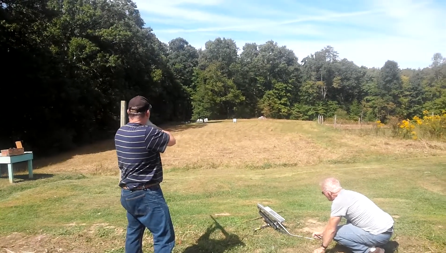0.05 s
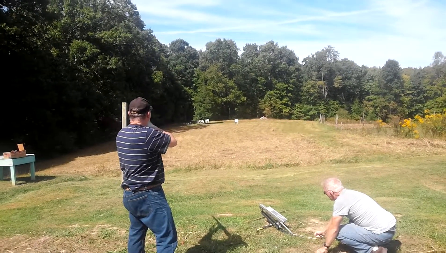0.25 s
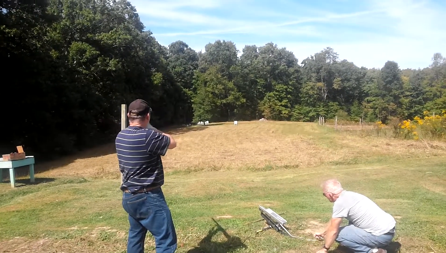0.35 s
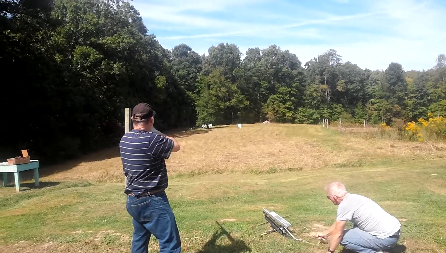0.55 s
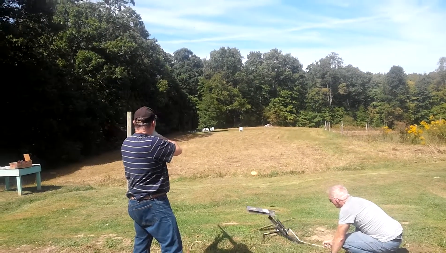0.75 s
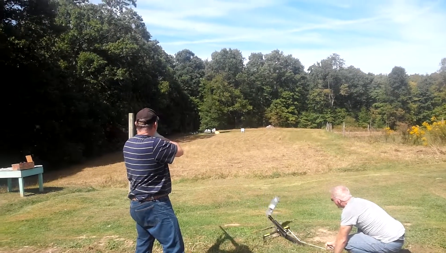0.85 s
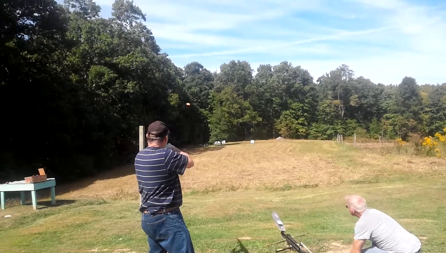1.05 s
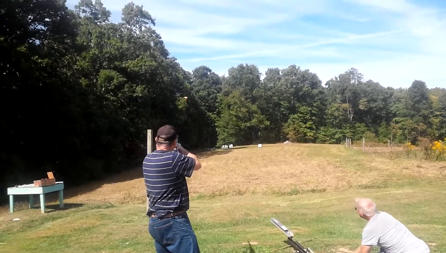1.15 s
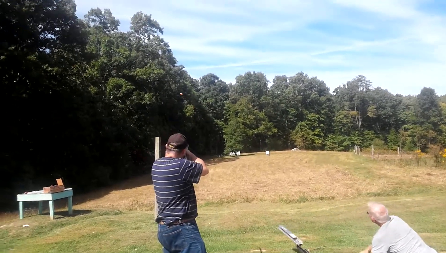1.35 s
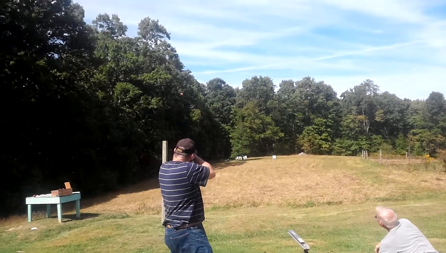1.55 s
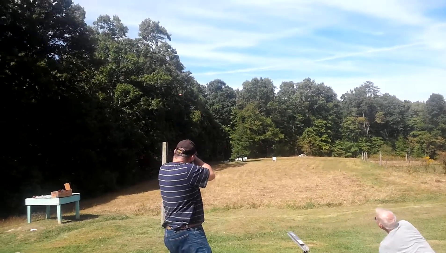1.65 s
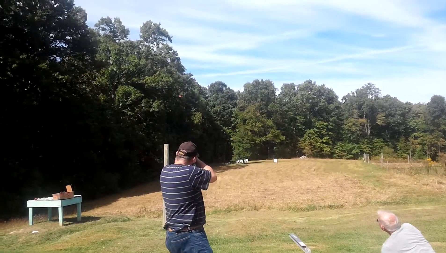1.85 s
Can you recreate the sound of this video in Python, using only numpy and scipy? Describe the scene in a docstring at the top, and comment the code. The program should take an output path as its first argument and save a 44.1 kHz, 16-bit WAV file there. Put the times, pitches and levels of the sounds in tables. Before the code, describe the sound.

A spring-loaded clay target thrower fires once, its steel arm slamming and rebounding with a ringing rattle. Wind rumbles on the microphone before and after, while grass hisses and insects chirp faintly in the open field.

```python
"""Gusts buffet the two microphone ports in an open field and hiss in the grass, where insects chirp
and buzz. About 0.6 s in, a spring-loaded clay target thrower fires to the right of the microphone:
the latch lets go, the steel arm swings, slams and rebounds. Its blows rattle plate, frame and spring
and leave the steel ringing; the stand thumps with the recoil, and ground and trees answer thinly."""
import sys
import numpy as np
from scipy import signal
from scipy.fft import rfft, irfft, next_fast_len
from scipy.io import wavfile
from scipy.ndimage import uniform_filter1d, map_coordinates

SR = 44100
rng = np.random.default_rng(int(sys.argv[2]) if len(sys.argv) > 2 else 0)


def master_out(mix):
    """Clip the mix to full scale and print it as 16-bit PCM to the path in sys.argv[1]."""
    frames = np.transpose(np.atleast_2d(mix))
    ceiling = np.clip(frames, -1, 1)
    pcm = np.round(ceiling * 32767).astype(np.int16)
    wavfile.write(sys.argv[1], SR, pcm)


N = 83790
TIME = np.arange(N) / SR


def amp(db):
    """Decibels to gain."""
    return 10 ** (np.asarray(db) / 20)


def unit(x):
    """Scale to rms 1."""
    return x / np.sqrt(np.mean(x ** 2) + 1e-20)


def along(points, hz):
    """Read (Hz, value) points on a log frequency axis."""
    freqs, values = np.transpose(points)
    return np.interp(np.log(hz + 1), np.log(freqs + 1), values)


def curves(rows):
    """One value per sample for each column after the time."""
    times, *columns = np.transpose(rows)
    return np.array([np.interp(TIME, times, column) for column in columns])


def wobble(rate):
    """A smooth random curve, rate knots a second."""
    return map_coordinates(rng.standard_normal(2048), [TIME * rate], mode="wrap")


def filtered(x, response):
    """Filter x by a gain given as a function of Hz."""
    size = next_fast_len(N + SR // 2)
    return irfft(rfft(x, size) * response(np.fft.rfftfreq(size, 1 / SR)), size)[..., :N]


def coloured(x, colour):
    """Filter x by (Hz, dB) points and scale to rms 1."""
    return unit(filtered(x, lambda hz: amp(along(colour, hz))))


def noise(colour):
    """Unrelated coloured noises, left and right."""
    return coloured(rng.standard_normal((2, N)), colour)


def steadied(x, seconds):
    """Even out the slow level changes of a noise, leaving its grain."""
    return x / np.sqrt(np.abs(uniform_filter1d(x ** 2, int(seconds * SR), axis=-1)) + 1e-9)


def burst(start, hold, attack, t60):
    """An envelope that rises, holds, then falls 60 dB in t60; all in seconds."""
    age = TIME - start
    return np.clip(age / attack, 0, 1) * amp(-60 * np.maximum(age - hold, 0) / t60)


def chirps(start_s=.004, period_s=.0586, length_s=.022, top_hz=7980, fall_hz=756):
    """An insect repeats a quick chirp that drops in pitch at its end."""
    progress = np.clip((TIME - start_s) % period_s / length_s, 0, 1)
    pitch = top_hz - fall_hz * progress ** 4 + 50 * wobble(490)
    envelope = amp(1 + 2 * wobble(17)) * np.sin(np.pi * progress)
    return envelope * np.sqrt(2) * np.sin(2 * np.pi * np.cumsum(pitch) / SR)


# Three insect voices out in the grass. Each row: frequency in Hz, relative level in dB.
CHORUS_COLOUR = [(7200, -25.5), (7900, -8.5), (8300, 0), (8480, -4.5), (8750, -24), (9500, -46.5)]
BUZZ_COLOUR = [(8700, -33.5), (9300, -6.5), (9580, 9), (9750, -3), (10100, -28.5)]
RASP_COLOUR = [(5400, -31.5), (6200, 2.5), (6500, -2.5), (7100, -22.5)]
# Short buzzes. Each entry: start in seconds.
BUZZ_STARTS = [.025, .248, .468, 1.083, 1.275, 1.464, 1.683, 1.88]
# Swell of all insects but the rasp. Each row: time in seconds, gain in dB.
INSECT_SWELL = [(0, -68), (.12, -51), (.26, -43), (.6, -44.5), (1.1, -50.5), (1.26, -64.5), (1.42, -52.5),
                (1.66, -55), (1.8, -49), (1.9, -50.5)]


def insects(pulse_hz=105):
    """Chirps and a distant chorus toward the left, short pulsed buzzes and one lower rasp."""
    calls = chirps() + amp(-1 + 1.3 * wobble(52)) * noise(CHORUS_COLOUR)
    leftward = amp([[2], [-2.5]])
    strokes = sum(burst(start, hold=.049, attack=.0086, t60=.05) for start in BUZZ_STARTS)
    pulses = np.abs(np.sin(np.pi * pulse_hz * TIME))
    buzzes = amp(1) * strokes * pulses * noise(BUZZ_COLOUR)
    rasp = amp(-53) * burst(1.335, hold=.14, attack=.015, t60=.3) * noise(RASP_COLOUR)
    return amp(curves(INSECT_SWELL)) * (calls * leftward + buzzes) + rasp


# The grass around the microphone. Each row: frequency in Hz, relative level in dB.
GRASS_COLOUR = [(200, 1), (600, 4), (1500, -2.5), (2800, 2), (6500, 1), (9500, 4.5), (10500, -5),
                (12500, -7.5), (15700, -12.5)]
# Its hiss in the wind. Each row: time in seconds, level in dB.
GRASS_SWELL = [(.03, -58), (.14, -49.5), (.27, -41.5), (.58, -43), (.95, -35), (1.12, -51), (1.18, -52.5),
               (1.23, -63.5), (1.30, -62.5), (1.38, -49), (1.48, -48.5), (1.52, -54.5), (1.61, -48.5),
               (1.68, -55.5), (1.76, -47.5), (1.9, -46.5)]


def grass():
    """Wind in the grass, a hiss that swells and sinks."""
    return amp(curves(GRASS_SWELL)) * noise(GRASS_COLOUR)


# Wind right on the microphone. Each row: time in seconds, left and right gain in dB.
GUST_SWELL = [(0, -53, -47), (.11, -35.5, -22.5), (.19, -28, -19.5), (.28, -16, -7.5), (.32, -13.5, -19),
              (.42, -5.5, -32), (.48, -20, -20.5), (.53, -5, -35), (.58, -18, -34), (.74, -11.5, -23.5),
              (.90, -21.5, -29), (1.05, -27, -30), (1.16, -31, -52), (1.26, -50, -50.5), (1.40, -28.5, -36),
              (1.66, -42, -33), (1.76, -23.5, -23.5), (1.85, -34, -20), (1.9, -45, -33.5)]
# Its rumble. Each row: frequency in Hz, relative level in dB.
GUST_COLOUR = [(12, -6), (33, 3), (90, -1.5), (150, -15), (240, -26.5), (400, -35.5), (800, -65),
               (2000, -86)]


def gusts(lump_db=4.5, lumps_per_s=35):
    """Gusts buffet each port differently, with a lumpy rumble."""
    lumps = amp(lump_db * np.array([wobble(lumps_per_s), wobble(lumps_per_s)]))
    return amp(curves(GUST_SWELL) - 4.5) * steadied(lumps * noise(GUST_COLOUR), seconds=.078)


# Sharp buffets on the microphone. Each row: start in seconds, left and right level in dB.
EDDY_SLAPS = [(0.148, -43, -24), (0.226, -26, -16), (0.296, -17, -22), (0.396, -16, -32),
              (0.512, -14.5, -34.5), (.585, -17.5, -33), (0.658, -21.5, -42), (1.443, -38, -38),
              (1.598, -48.5, -34.5), (1.742, -36, -36.5)]
# Their low tone. Each row: frequency in Hz, relative level in dB.
EDDY_COLOUR = [(70, -14), (120, 4.5), (175, 0.5), (270, -13), (400, -25), (800, -45), (2000, -75)]


def eddies():
    """Short eddies slap the ports."""
    push = sum(amp([[left], [right]]) * burst(start, hold=.019, attack=.012, t60=.13)
               for start, left, right in EDDY_SLAPS)
    return push * steadied(noise(EDDY_COLOUR), seconds=.041)


# The field's answer to the thrower. Each row: frequency in Hz, t60 in seconds.
FIELD_DECAY = [(300, 1), (1200, .33), (4000, .5), (9000, .22), (15000, .35)]


def field_echo(x):
    """Ground and trees scatter the sound into a thin tail."""
    hz, age, spectrum = signal.stft(rng.standard_normal((2, SR)), SR, nperseg=256)
    decay = amp(-60 * age / along(FIELD_DECAY, hz)[:, None])
    tail = signal.istft(spectrum * decay, SR, nperseg=256)[1]
    return signal.fftconvolve(x, tail / np.linalg.norm(tail[0]), axes=1)[:, :N]


# The thrower at the two ports. Each row: frequency in Hz, likeness (1 or more is fully alike).
PORT_LIKENESS = [(250, 4.5), (1300, 1.6), (2200, 0.68), (5000, -0.18), (9000, 0.45), (14000, -0.3)]
# Its balance there. Each row: frequency in Hz, left minus right in dB.
PORT_BALANCE = [(1400, 0), (2100, 1), (3600, -2.5), (5200, -2.5), (6600, 6.5), (8600, -0.5), (10300, 4.5),
                (12000, -1), (14000, -6)]


def at_ports(pair, lag_s=.00006):
    """The thrower stands to the right: its sound is partly alike at the ports, later at the left."""
    half = np.array([[.5], [-.5]])

    def width(hz):
        angle = np.arccos(np.clip(along(PORT_LIKENESS, hz), -1, 1)) / 2
        return np.array([np.cos(angle), np.sin(angle)])

    def direction(hz):
        return amp(half * along(PORT_BALANCE, hz)) * np.exp(-2j * np.pi * hz * half * lag_s)

    mid, side = filtered(pair, width)
    return filtered(np.array([mid + side, mid - side]), direction)


# Recoils into the stand. Each row: start in seconds, level in dB.
RECOILS = [(.652, -42), (.714, -28.5), (.788, -35.5), (.912, -35.5)]
# Modes of its legs. Each row: frequency in Hz, relative level in dB, t60 in seconds.
LEG_MODES = [(252, 0, 0.11), (283.5, -2, 0.054), (382.7, -8, 0.382), (420, -4, .25)]


def stand():
    """The legs take the recoil with low hollow thumps."""
    return sum(amp(recoil_db + mode_db) * burst(start, hold=0, attack=.0037, t60=t60)
               * np.sqrt(2) * np.sin(2 * np.pi * (hz * TIME + rng.random()))
               for start, recoil_db in RECOILS for hz, mode_db, t60 in LEG_MODES)


def loose_part(hz=3800):
    """A loose part, struck once, pings."""
    return amp(-32.5) * burst(1.0235, hold=0, attack=.001, t60=.068) * np.sin(2 * np.pi * hz * TIME)


# The thrower's ringing steel. Each row: frequency in Hz, dB relative to the blows, t60 in seconds.
STEEL_MODES = [(711, -30, .6), (944, -13.5, 0.11), (998, -15, 0.16), (1106, -16, 0.68), (1141, -13, 0.084),
               (1205, -8, 0.08), (1437, -21, 0.43), (1940, -23, 0.36), (3530, -17, .3), (3660, -13.5, .15),
               (3720, -16.5, .25), (3954, -13.5, 0.11), (4180, -15.5, .25), (5060, -20, 0.072)]


def ringing(plate_force, spring_force, split_hz=1750):
    """Each mode stores the energy of the blows and lets it die away."""
    out = np.zeros((2, N))
    for hz, db, t60 in STEEL_MODES:
        drive = plate_force if hz < split_hz else spring_force
        retained = amp(-120 / (t60 * SR))  # share of energy left after one sample
        level = np.sqrt(signal.lfilter([1 - retained], [1, -retained], drive ** 2))
        phase = 2 * np.pi * (hz * TIME + rng.random()) + .71 * wobble(40)
        tone = np.array([np.sin(phase), np.cos(phase) * rng.choice([-1, 1])])
        out += amp(db) * level * np.sqrt(2) * tone
    return out


def shifting(pair, depth_db=3.5):
    """Partials come and go as the contact points move."""
    spectrum = signal.stft(pair, nperseg=1024)[2]
    patches = uniform_filter1d(rng.standard_normal(spectrum.shape[1:]), size=3, axis=0)
    patches = uniform_filter1d(patches, size=5, axis=1)
    return signal.istft(spectrum * amp(depth_db * unit(patches)), nperseg=1024)[1][:, :N]


def rattle(colour, contacts_per_s=900, contact_s=.0012, scrape_share=.58):
    """Dense steel-on-steel contacts of random size and smooth scraping, heard through one part."""
    ticks = (rng.random(N) < contacts_per_s / SR) * amp(5 * rng.standard_normal(N))
    power = signal.lfilter([1], [1, -np.exp(-1 / (contact_s * SR))], ticks ** 2)
    envelope = np.sqrt(scrape_share + (1 - scrape_share) * power / power.mean())
    contacts = envelope * rng.standard_normal((2, N))
    return steadied(coloured(shifting(contacts), colour), seconds=.014)


# The arm plate early and late in the swing. Each row: frequency in Hz, relative level in dB.
PLATE_EARLY = [(500, -52), (820, -17), (940, 3), (1150, 1.5), (1330, -2), (1520, -5.5), (1750, -17.5),
               (2600, -35.5)]
PLATE_LATE = [(500, -44), (850, -21.5), (945, 3), (1060, -7.5), (1230, 0.5), (1370, 1), (1520, -7.5),
              (1750, -20), (2600, -47.5)]


def plate(free_at_s=.705):
    """The plate's clank turns higher as the arm swings free."""
    free = np.clip((TIME - free_at_s) / .01 + .5, 0, 1)
    return np.sqrt(1 - free) * rattle(PLATE_EARLY) + np.sqrt(free) * rattle(PLATE_LATE)


# Blows of the arm. Each row: start and hold in seconds, then relative levels in dB for
# plate, frame, spring and contact sizzle.
ARM_BLOWS = [(.615, .007, -42.5, -33, -31.5, -35), (.624, 0.01, -29, -25, -22.5, -26),
             (0.636, 0.0042, -11, -13.5, -14.5, -12.5), (0.653, 0.0067, -17.5, -21, -21.5, -29.5),
             (0.6555, 0.003, -15, -26, -14.5, -10.5), (0.667, 0.011, -15, -25.5, -23, -26.5),
             (0.6857, 0.0057, -12.5, -17, -17, -10), (0.697, .017, -37, -26.5, -12.5, -9.5),
             (.719, .017, -15.5, -23, -14, -13.5), (0.747, 0.021, -24, -30, -23.5, -30),
             (0.781, .016, -22.5, -24.5, -20.5, -19.5), (0.802, .013, -27, -24, -17.5, -26),
             (0.88, 0.025, -30.5, -28, -23.5, -23.5), (0.9134, .004, -21.5, -19, -19, -13.5),
             (0.924, 0.0096, -29, -38, -27, -33.5), (0.94, .003, -42, -43.5, -35, -41),
             (0.989, .016, -43, -44.5, -44, -43.5), (0.999, .009, -40.5, -42, -38, -40),
             (1.0206, .002, -53, -47.5, -33, -32.5), (1.14, 0.0099, -46.5, -51, -43.5, -48),
             (1.154, .018, -49, -51, -50, -47)]


def blows(part, t60, attack=.001):
    """The arm's blows add in energy to one envelope for the named part."""
    column = ("plate", "frame", "spring", "sizzle").index(part)
    return np.sqrt(sum((amp(levels[column]) * burst(start, hold, attack, t60)) ** 2
                       for start, hold, *levels in ARM_BLOWS))


# Frame, coil spring, contacts and stand. Each row: frequency in Hz, relative level in dB.
FRAME_COLOUR = [(1100, -42), (1650, -8), (1950, -4.5), (2210, 0), (2450, -3.5), (2740, 1.5), (3000, 0.5),
                (3500, -21)]
SPRING_COLOUR = [(2600, -37), (3200, 0), (3700, 2.5), (4100, 3.5), (4650, 1), (5150, 1.5), (5900, -3.5),
                 (7500, -26)]
SIZZLE_COLOUR = [(4500, -23.5), (6300, 0.5), (7800, -0.5), (8450, 6), (9100, 1), (9600, 1.5), (10600, -8),
                 (11600, -5), (13200, -14.5), (15700, -20.5)]
STAND_COLOUR = [(120, -35.5), (245, -3.5), (320, -3.5), (410, -1), (470, -4.5), (700, -10), (900, -17.5)]


def thrower():
    """The blows shake plate, frame, spring and stand, and leave the steel ringing."""
    plate_force = blows("plate", t60=.05, attack=.0034)
    spring_force = blows("spring", t60=.049)
    steel = (amp(-2) * plate_force * plate()
             + amp(-2) * blows("frame", t60=.095) * rattle(FRAME_COLOUR)
             + amp(-1.5) * spring_force * rattle(SPRING_COLOUR)
             + amp(-1) * blows("sizzle", t60=.061) * rattle(SIZZLE_COLOUR)
             + amp(-17.5) * spring_force * rattle(STAND_COLOUR))
    echo = amp(-13) * field_echo(steel)
    return at_ports(steel + echo + ringing(plate_force, spring_force)) + loose_part() + stand()


def scene():
    """The thrower in the windy field, heard from one stereo microphone."""
    return thrower() + gusts() + eddies() + grass() + insects()


def record(dry, top_hz=15750):
    """The recorder rounds the highest peaks and keeps nothing above its band limit."""
    rounded = dry / (1 + np.abs(dry) ** 8) ** (1 / 8)
    return filtered(rounded, lambda hz: hz < top_hz)


dry = scene()
out = record(dry)
master_out(out)
```